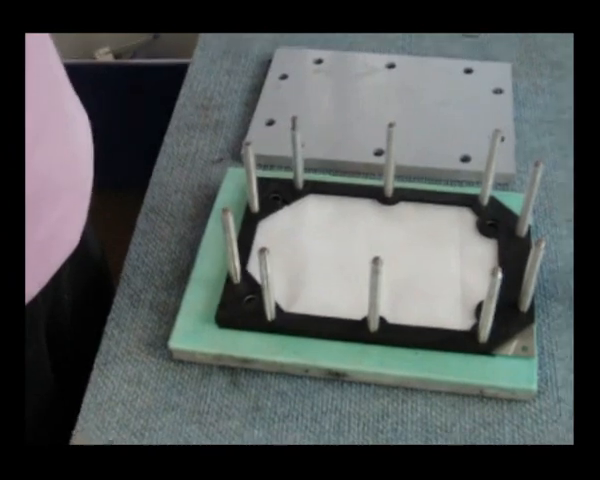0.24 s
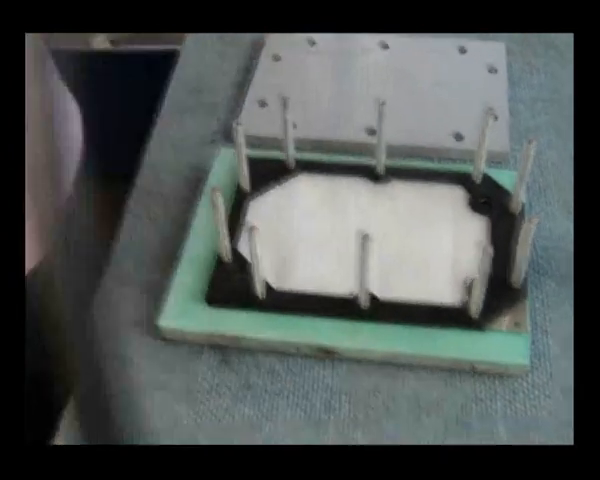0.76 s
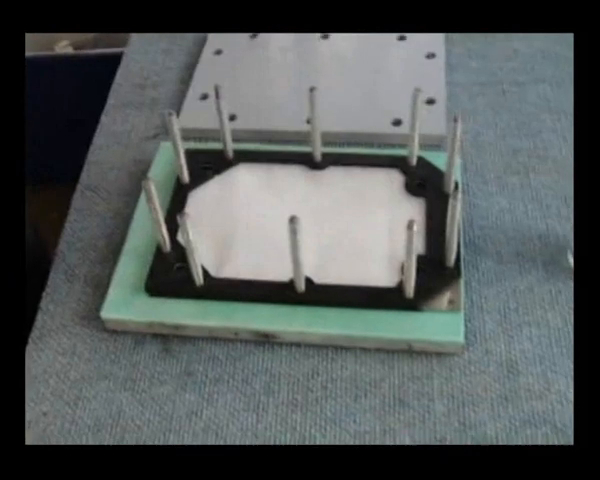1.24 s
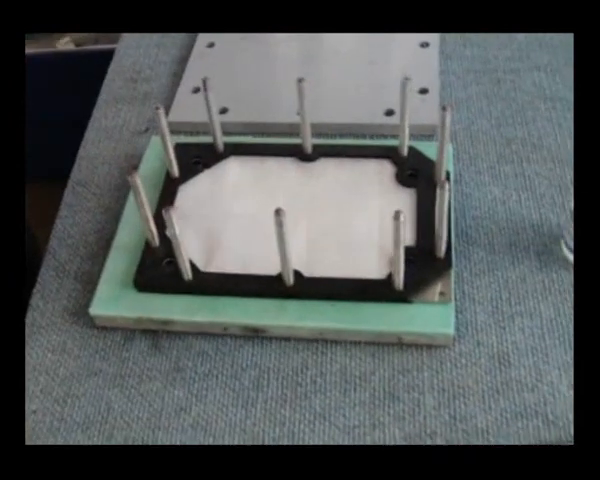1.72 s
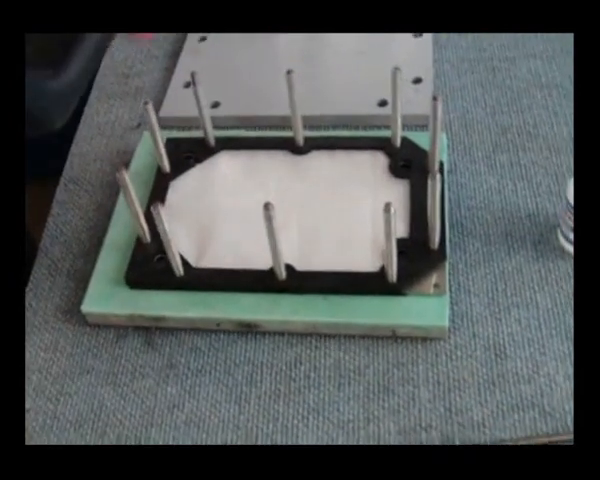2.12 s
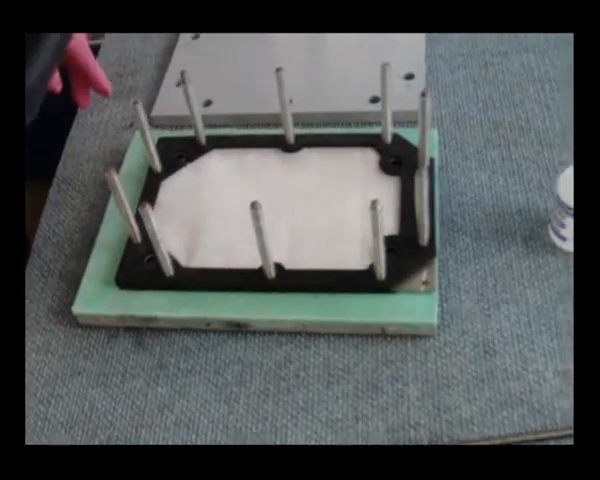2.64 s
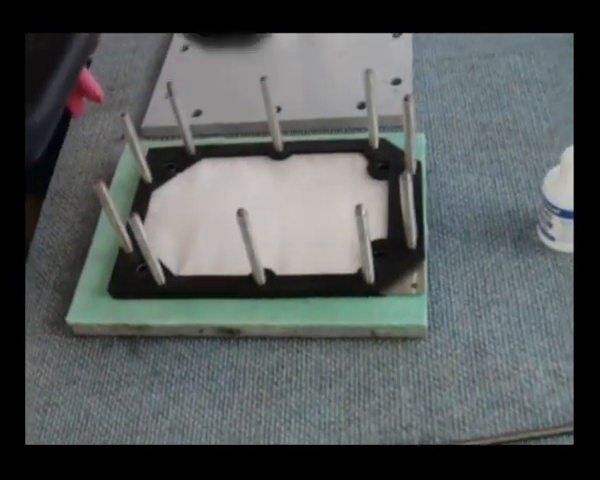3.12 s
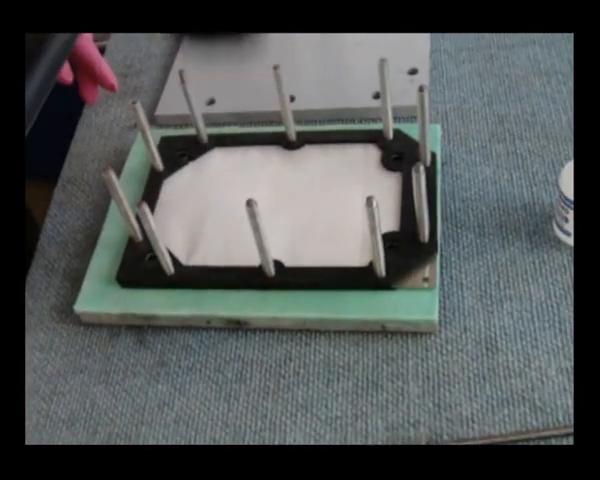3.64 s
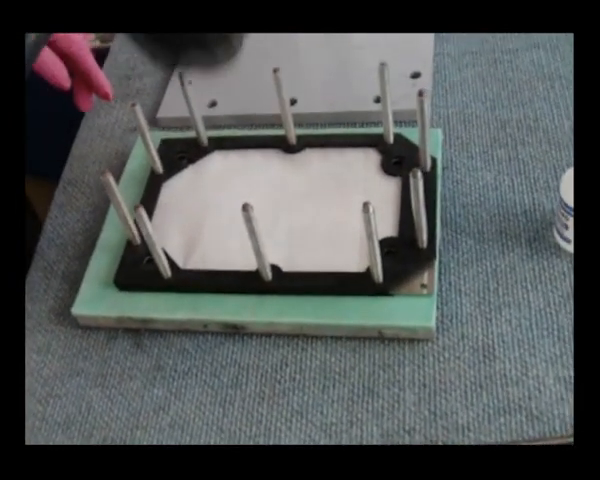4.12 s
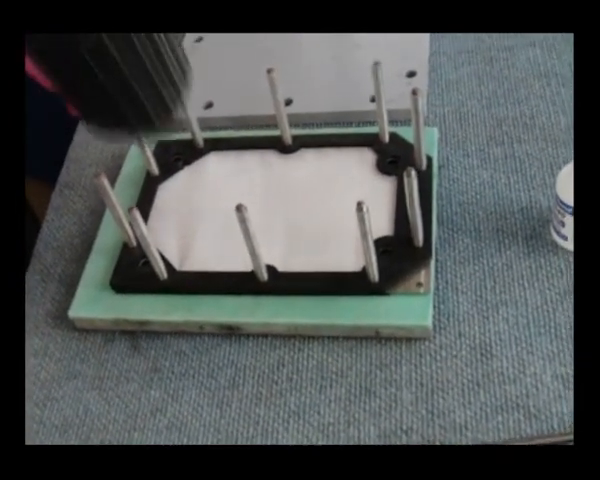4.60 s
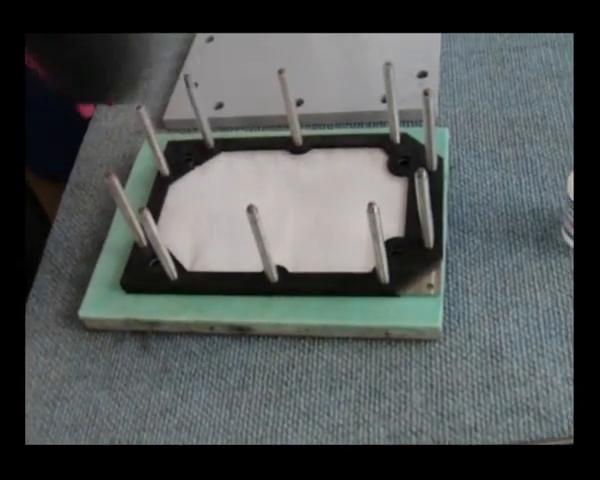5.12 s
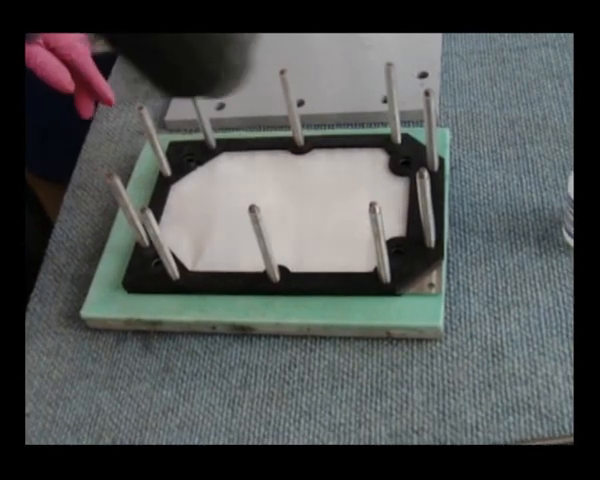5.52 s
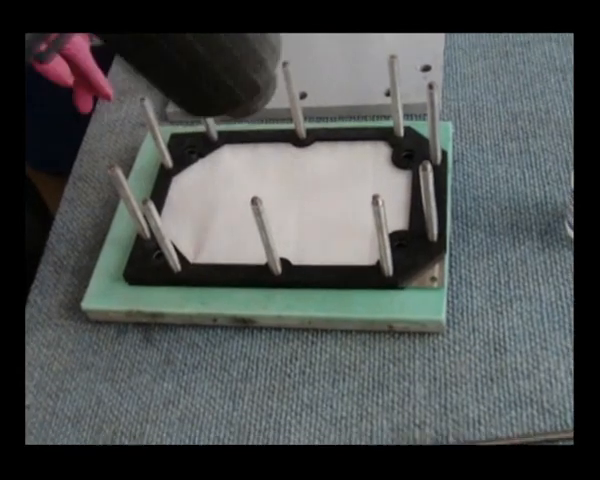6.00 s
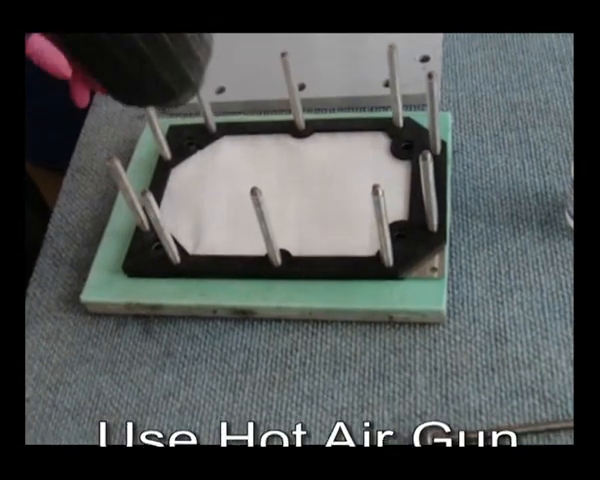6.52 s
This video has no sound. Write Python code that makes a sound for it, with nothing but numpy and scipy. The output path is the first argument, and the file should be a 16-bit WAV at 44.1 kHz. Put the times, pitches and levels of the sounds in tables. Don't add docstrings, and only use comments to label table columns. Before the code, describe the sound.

An electric heat gun finishes spinning up, its stacked motor tones rising quickly and then holding nearly steady. Strong rushing air surrounds a piercing blade whine around 2.8 kilohertz. As the tool is waved about, individual tones flutter, bloom and cancel. Faint low workshop rumble and hum lie beneath; close, nearly mono pickup with the extreme treble cut off.

```python
import sys
import numpy as np
from scipy import signal
from scipy.fft import rfft, irfft
from scipy.io import wavfile
from scipy.ndimage import uniform_filter1d

SR = 44100
rng = np.random.default_rng(int(sys.argv[2]) if len(sys.argv) > 2 else 0)


def volts_from_decibels(level):
    exponent = np.asarray(level, float) / 20
    return 10 ** exponent


def to_wav(sig):
    pcm = np.clip(np.atleast_2d(sig), -1, 1) * 32767
    pcm = np.round(pcm).astype(np.int16)
    wavfile.write(sys.argv[1], SR, pcm.T)


N = 297675

# (time [s], shaft speed [Hz])
RUNNING_SPEED = [(0.0, 349.5), (1.15, 350.3), (1.5, 349.2), (2.7, 349.7), (2.95, 352.7), (3.15, 353.0),
                 (3.5, 354.5), (3.8, 351.9), (4.3, 349.8), (4.45, 350.1), (4.65, 352.3), (4.95, 353.9),
                 (5.2, 353.3), (5.4, 354.2), (5.65, 352.5), (6.0, 352.2), (6.4, 351.4), (6.75, 351.4)]
# (time [s], rms level [dB])
SHAFT_LEVEL = [(0.0, -36), (0.11, -40), (0.34, -33), (0.39, -42), (0.55, -39), (0.6, -33.5), (1.05, -32.5),
               (1.5, -29.5), (2.0, -30.5), (2.35, -29), (2.85, -28), (3.3, -30), (4.36, -28.5), (5.3, -33),
               (5.6, -29.5), (5.92, -32), (6.03, -26.5), (6.24, -29)]
# (shaft multiple, level while spinning up [dB], level at full speed [dB])
HARMONICS = [(2, -44.0, -38.0), (3, -43.0, -37.5), (4, -33.0, -38.0), (5, -33.0, -39.0), (6, -38.0, -35.0),
             (7, -39.0, -29.0), (8, -23.0, -25.5), (9, -40.0, -28.0), (10, -38.0, -39.0),
             (11, -45.0, -38.0), (13, -46.0, -46.0), (14, -44.0, -39.0), (15, -36.0, -44.0),
             (16, -46.0, -45.0), (19, -48.0, -45.0), (20, -49.0, -44.0), (21, -53.0, -47.0),
             (22, -55.0, -47.0), (23, -52.0, -46.0), (24, -50.0, -42.0), (25, -46.0, -40.0),
             (26, -49.0, -40.5), (27, -51.0, -38.5), (28, -54.0, -43.0), (29, -45.0, -43.0),
             (30, -50.0, -40.0), (31, -43.0, -40.0), (32, -52.0, -40.0), (33, -43.0, -44.0),
             (34, -38.0, -60.0)]
# (time [s], peak [dB], length [s])
BLADE_SWELLS = [(0.268, -21.5, 0.2), (0.455, -22, 0.58), (0.824, -19, 0.43), (1.126, -20.5, 0.18),
                (1.67, -18.5, 0.4), (2.044, -21, 0.36), (2.322, -20.5, 0.29), (2.59, -22, 0.2),
                (2.81, -21.5, 0.33), (3.005, -21, 0.57), (3.85, -25, 0.11), (4.08, -27, 0.12),
                (4.345, -25, 0.17), (4.947, -18.5, 0.18), (5.494, -17.5, 0.19), (5.62, -22, 0.1),
                (6.05, -19, 0.11), (6.286, -23, 0.13), (6.6, -19, 0.15), (6.74, -21.5, 0.34)]
# (time [s], shaft multiple, peak [dB], length [s])
NEIGHBOUR_SWELLS = [(0.45, 7, -30, 0.08), (0.905, 7, -23, 0.66), (1.2, 7, -23, 0.46), (1.442, 7, -20, 0.3),
                    (1.9, 7, -25, 0.24), (2.543, 7, -27, 0.16), (2.93, 7, -26, 0.15),
                    (3.55, 7, -27.5, 0.26), (4.072, 7, -29, 0.15), (4.67, 7, -26, 0.36),
                    (5.24, 7, -34, 0.12), (5.87, 7, -28, 0.16), (1.914, 9, -27, 0.15),
                    (2.154, 9, -23.5, 0.18), (2.453, 9, -25, 0.35), (2.657, 9, -22, 0.25),
                    (2.798, 9, -23, 0.12), (3.33, 9, -23, 0.1), (3.7, 9, -23.5, 0.074),
                    (3.875, 9, -21, 0.17), (4.242, 9, -20, 0.1), (4.383, 9, -21, 0.19),
                    (4.88, 9, -23.5, 0.24), (5.1, 9, -28, 0.15), (5.34, 9, -24, 0.16), (5.89, 9, -29, 0.1),
                    (6.5, 9, -28, 0.22), (0.04, 9, -32, 0.071)]
# (time [s], shaft multiple, peak [dB], length
# [s])
OTHER_SWELLS = [(0.05, 5, -27, 0.31), (0.174, 15, -30, 0.15), (0.22, 36, -38, 0.14), (0.258, 35, -28, 0.12),
                (0.27, 4, -23, 0.17), (0.426, 34, -30, 0.15), (0.457, 5, -26, 0.16), (1.2, 27, -31.5, 0.29),
                (1.363, 5, -28, 0.48), (1.47, 31, -29.5, 0.18), (1.634, 3, -28.5, 0.27),
                (1.858, 33, -31, 0.13), (2.405, 31, -29, 0.14), (3.112, 6, -30, 0.24),
                (3.45, 30, -29, 0.24), (3.653, 6, -29, 0.21), (3.66, 2, -28, 0.12), (4.196, 2, -30.5, 0.17),
                (4.21, 10, -30, 0.26), (4.38, 14, -36, 0.77), (4.7, 6, -31, 0.43), (5.137, 2, -31, 0.15),
                (5.197, 4, -28, 0.24), (5.595, 14, -34, 0.7), (5.65, 31, -34, 0.22), (5.697, 4, -29, 0.45),
                (5.898, 30, -30, 0.22), (6.016, 11, -32.5, 0.46), (6.1, 3, -29, 0.19), (6.41, 5, -31, 0.98)]
# (time [s], shaft multiple, peak [dB], length [s])
SOFT_SWELLS = [(0.49, 4, -32, 0.81), (0.704, 10, -33.5, 0.21), (1.384, 4, -32, 0.37), (1.9, 4, -31, 0.14),
               (1.75, 5, -32, 0.3), (2.347, 4, -32, 0.17), (3.14, 2, -30, 0.19), (3.14, 4, -34, 0.26),
               (0.3, 33, -37, 0.27), (0.31, 25, -35, 0.14), (6.693, 4, -31, 0.15), (3.11, 11, -33, 0.33),
               (4.12, 11, -34, 0.29), (4.73, 11, -31.5, 0.39), (6.49, 11, -29.5, 0.34),
               (2.3, 27, -32, 0.17), (2.4, 30, -35, 0.39), (2.78, 30, -37, 0.33), (3.34, 26, -29, 0.12),
               (3.892, 30, -27, 0.16), (4.18, 27, -37, 0.37), (4.39, 31, -33, 0.2), (4.56, 26, -38, 0.17),
               (4.75, 27, -33, 0.2), (5.21, 31, -33, 0.24), (5.33, 26, -31, 0.2), (5.44, 25, -35, 0.15),
               (5.713, 27, -32, 0.15), (5.972, 25, -29.5, 0.24), (6.17, 31, -31, 0.44)]
# (time [s], shaft multiple, trough [dB], length [s])
FADES = [(2.45, 8, -41, 0.14), (3.472, 8, -38, 0.17), (3.945, 8, -43, 0.17), (4.16, 8, -39, 0.087),
         (4.466, 8, -37, 0.082), (5.19, 8, -47, 0.18), (5.7, 8, -38, 0.15), (5.853, 8, -34, 0.06),
         (6.18, 8, -33, 0.1), (6.53, 8, -42, 0.11), (2.1, 7, -35, 0.3), (2.42, 7, -38, 0.12),
         (2.72, 7, -39, 0.2), (3.3, 7, -36, 0.15), (5.5, 7, -39, 0.35), (6.1, 7, -37, 0.25),
         (6.54, 7, -40, 0.08), (1.07, 9, -39, 0.2), (2.93, 9, -39, 0.1), (4.08, 9, -32, 0.12),
         (5.752, 9, -31, 0.15), (5.97, 9, -36, 0.1), (0.36, 15, -50, 0.2), (0.6, 15, -48, 0.52),
         (0.0, 8, -39, 0.06), (0.0, 4, -42, 0.12), (0.1, 8, -31, 0.1), (0.8, 5, -42, 0.37),
         (0.415, 8, -28, 0.036), (0.59, 8, -25, 0.08)]
# (frequency [Hz], level [dB per Hz])
RUSH_COLOUR = [(250, -21.5), (470, -15), (620, -3.5), (1120, 1), (1280, -5.5), (1700, -8), (2050, -2.5),
               (3500, -4), (3700, -9), (6300, -10), (8700, -13.5), (10600, -9.5), (12500, -13)]
# (frequency [Hz], width [Hz], gain [dB])
BARREL_MODES = [(4800, 150, 4.5), (5320, 320, -3.5), (5770, 130, 3.5), (6870, 84, -4), (10500, 130, 1)]
# (frequency [Hz], level [dB per Hz])
SHOP_COLOUR = [(20, -6), (38, -5), (66, -11), (80, 0), (140, -2), (250, -2), (320, -1.5), (500, -2.5),
               (900, -37)]

FULL_SPEED_GAP_HZ, SPIN_UP_TAU_S = 75, 0.31
SPUN_UP_S = (0.27, 1)
BLADES, TOP_MULTIPLE = 8, 40
FAINT_DB, BETWEEN_SWELLS_DB = -52, -1
HOUSING_HZ, HOUSING_WIDTH_HZ, HOUSING_DB = 12000, 1200, -43
BEARING_MULTIPLE, BEARING_DB = 4.72, -43

RUSH_DB, FLOW_DB, FLOW_POWER = 6, -25.5, 1.2
HISS_DB, HISS_POWER, HISS_OVER_FLOW_DB, HISS_FROM_HZ = -28.5, 2.5, 3.5, 3200
LATE_HISS_HZ, LATE_HISS_WIDTH_HZ, LATE_HISS_POWER = 8000, 2000, 2.2
AIM_S, AIM_AWAY_DB = (1.3, 2.1), -2.5

SHOP_DB, HUM_HZ, HUM_DB = -44.5, 161, -56.5
TOP_HZ = (11860, 12010)


def curve(table):
    times, values = np.transpose(table)
    return np.interp(np.arange(N) / SR, times, values)


def walk(rate):
    knots = np.arange(0, N / SR + 2 / rate, 1 / rate)
    coarse = np.arange(0, N / SR, 1 / 400)
    steps = np.interp(coarse, knots, rng.standard_normal(len(knots)))
    drift = uniform_filter1d(steps, int(400 / rate))
    return np.interp(np.arange(N) / SR, coarse, (drift - drift.mean()) / drift.std())


def bands(colour, swell, resonances=()):
    hz = np.fft.rfftfreq(N, 1 / SR) + 1e-3
    points_hz, points_db = np.array(colour, float).T
    colour_db = np.interp(np.log(hz), np.log(points_hz), points_db, -90, -90)
    for mode_hz, width_hz, gain_db in resonances:
        colour_db += gain_db * np.exp(-((hz - mode_hz) / width_hz) ** 2)
    noise = rfft(rng.standard_normal(N)) * volts_from_decibels(colour_db)
    noise = noise / np.std(irfft(noise, N))
    lowest = np.ceil(3 * np.log2(points_hz[0])) / 3
    highest = np.log2(points_hz[-1]) + 1 / 3
    out = np.zeros(N)
    for centre in 2 ** np.arange(lowest, highest, 1 / 3):
        share = np.cos(np.pi / 2 * np.clip(3 * np.log2(hz / centre), -1, 1)) ** 2
        out += swell(centre) * irfft(noise * share, N)
    return out


def spin_up():
    return FULL_SPEED_GAP_HZ * np.exp(-np.arange(N) / SR / SPIN_UP_TAU_S)


def housing_db(hz):
    return HOUSING_DB - 6 * ((hz - HOUSING_HZ) / HOUSING_WIDTH_HZ) ** 2


def moving_paths(k, hz, early_db, late_db, swells):
    t = np.arange(N) / SR
    spun = np.interp(t, SPUN_UP_S, (0, 1))
    rate = 3.54 + 0.197 * k
    spread = 0.25 if abs(k - BLADES) < 2 else 0.42
    paths = 0.92 + spread * (walk(rate) + 1j * walk(rate))
    level_db = early_db + spun * (late_db - early_db) + BETWEEN_SWELLS_DB
    size = volts_from_decibels(np.maximum(level_db, housing_db(k * hz))) * paths
    for time, multiple, peak_db, length in swells:
        if round(multiple) != k:
            continue
        near = slice(max(int((time - 2 * length) * SR), 0), int((time + 2 * length) * SR))
        rise = np.exp(-(3.07 * (t[near] - time) / length) ** 2)
        size[near] += (volts_from_decibels(peak_db) - size[near]) * rise
    return size


def bearing(turn):
    return np.sqrt(2) * volts_from_decibels(BEARING_DB + 2.5 * walk(2.92)) * np.sin(BEARING_MULTIPLE * turn)


def motor():
    hz = uniform_filter1d(curve(RUNNING_SPEED), SR // 16, mode="nearest") - spin_up()
    turn = 2 * np.pi * np.cumsum(hz * (1 + 0.000362 * walk(25))) / SR
    levels = {round(k): (early_db, late_db) for k, early_db, late_db in HARMONICS}
    swells = [(time, BLADES, peak_db, length) for time, peak_db, length in BLADE_SWELLS]
    swells += [*NEIGHBOUR_SWELLS, *OTHER_SWELLS, *SOFT_SWELLS, *FADES]
    out = np.zeros(N)
    for k in range(1, TOP_MULTIPLE + 1):
        if k == 1:
            size = volts_from_decibels(curve(SHAFT_LEVEL) + 0.41 * walk(5.6))
        else:
            early_db, late_db = levels.get(k, (FAINT_DB, FAINT_DB))
            size = moving_paths(k, hz, early_db, late_db, swells)
        flutter_db = (0.35 + 0.041 * k) * walk(14) + (0.45 + 0.053 * k) * walk(45)
        phase = k * turn + 2 * np.pi * rng.random()
        out += np.sqrt(2) * np.real(size * volts_from_decibels(flutter_db) * np.exp(1j * phase))
    return out + bearing(turn)


def air():
    speed_db = 20 * np.log10(1 - spin_up() / RUNNING_SPEED[0][1])
    aim_db = np.interp(np.arange(N) / SR, AIM_S, (AIM_AWAY_DB, 0))
    flow_db = FLOW_DB + FLOW_POWER * speed_db
    hiss_db = HISS_DB + HISS_POWER * speed_db + aim_db
    wave = walk(4.25)

    def swell(hz):
        treble = np.clip(np.log2(hz / HISS_FROM_HZ) + 1, 0, 1)
        sway_db = 0.12 * treble * wave + 0.22 * walk(2.69) + 0.79 * walk(9)
        late = np.exp(-((hz - LATE_HISS_HZ) / LATE_HISS_WIDTH_HZ) ** 2)
        sway_db += LATE_HISS_POWER * late * speed_db
        return volts_from_decibels(RUSH_DB + flow_db + treble * (hiss_db + HISS_OVER_FLOW_DB - flow_db) + sway_db)

    return bands(RUSH_COLOUR, swell, BARREL_MODES)


def workshop():
    rumble = bands(SHOP_COLOUR, lambda hz: volts_from_decibels(SHOP_DB + 1.4 * walk(1.45)))
    hum = np.sqrt(2) * np.sin(2 * np.pi * np.cumsum(HUM_HZ * (1 + 0.0035 * walk(2.7))) / SR)
    return rumble + hum * volts_from_decibels(HUM_DB + 1.2 * walk(1.87))


def scene():
    mono = motor() + air() + workshop()
    sub_colour = [(10, 0), (18, 0), (32, -16), (70, -17), (110, -40)]  # (frequency [Hz], level [dB per Hz])
    drift = bands(sub_colour, lambda hz: volts_from_decibels(-63))
    return np.array([mono + drift, mono - drift])


def low_pass(x):
    return signal.sosfilt(signal.butter(12, 13100, fs=SR, output="sos"), x)


def record(dry):
    top = volts_from_decibels(np.interp(np.fft.rfftfreq(N, 1 / SR), TOP_HZ, (0, -90)))
    mix = irfft(rfft(dry) * top, N)
    return low_pass(mix)


dry = scene()
out = record(dry)
to_wav(out)
```